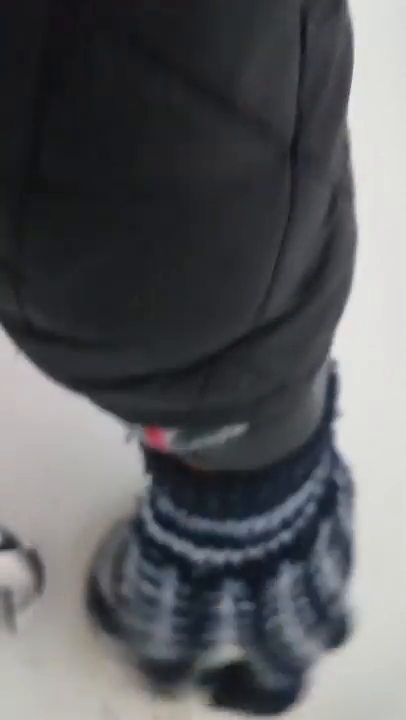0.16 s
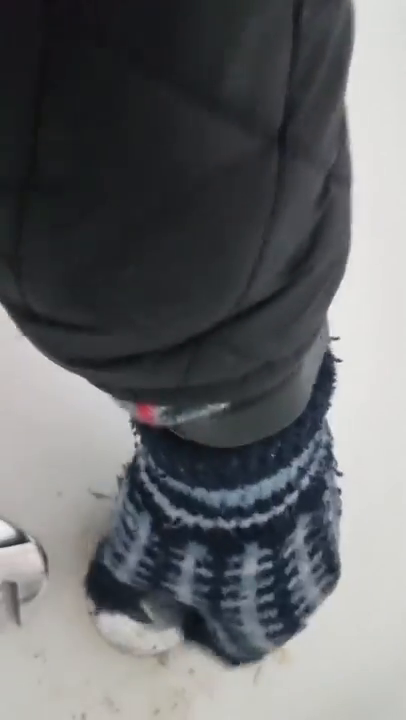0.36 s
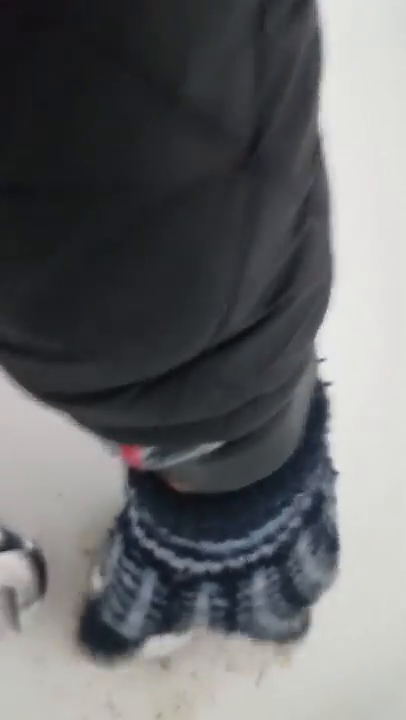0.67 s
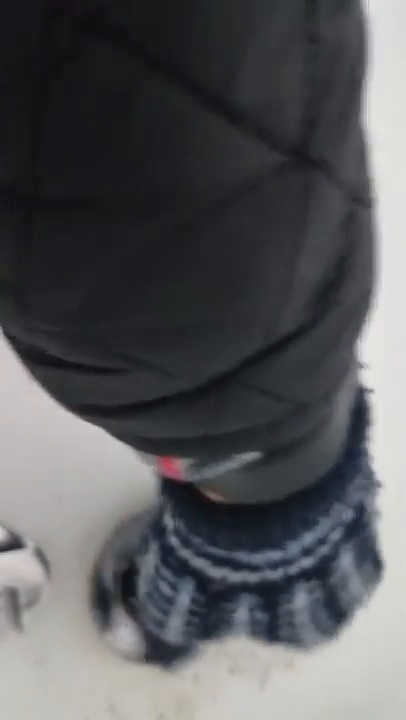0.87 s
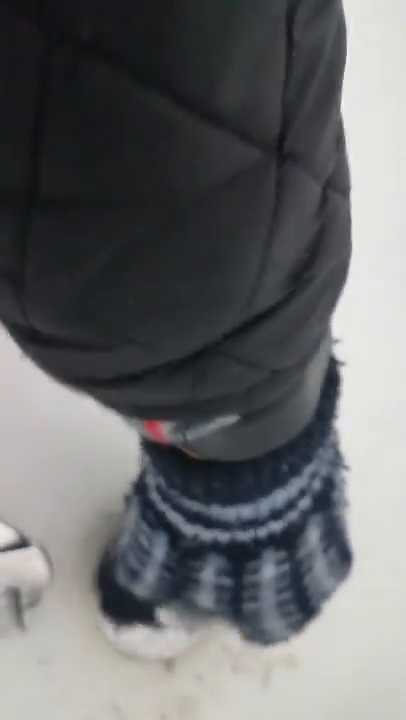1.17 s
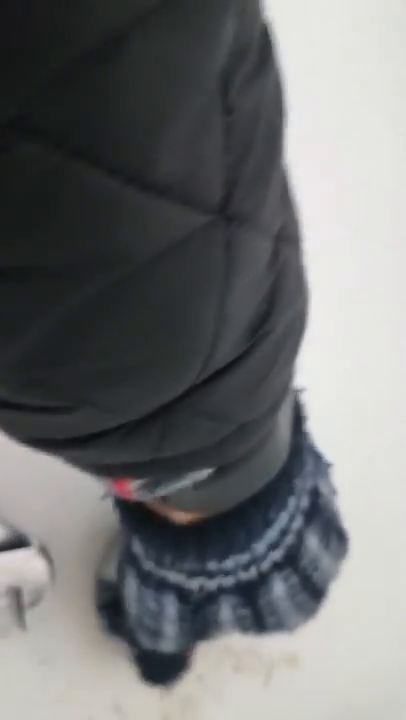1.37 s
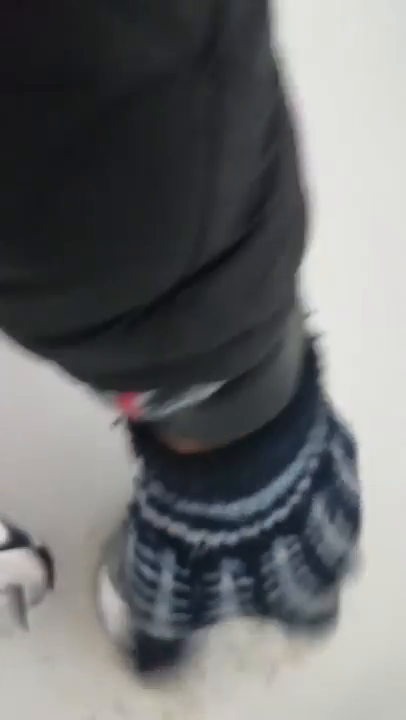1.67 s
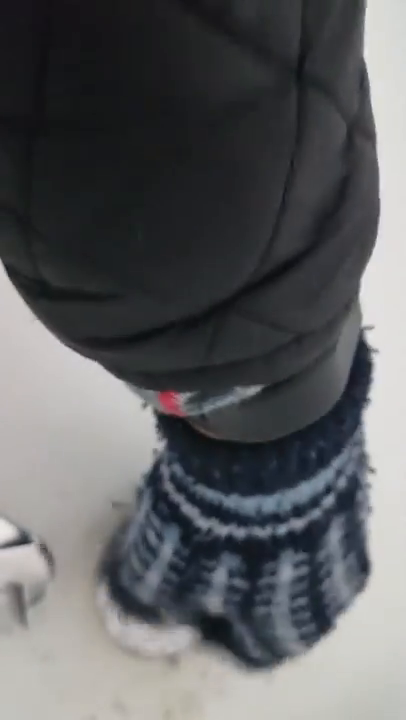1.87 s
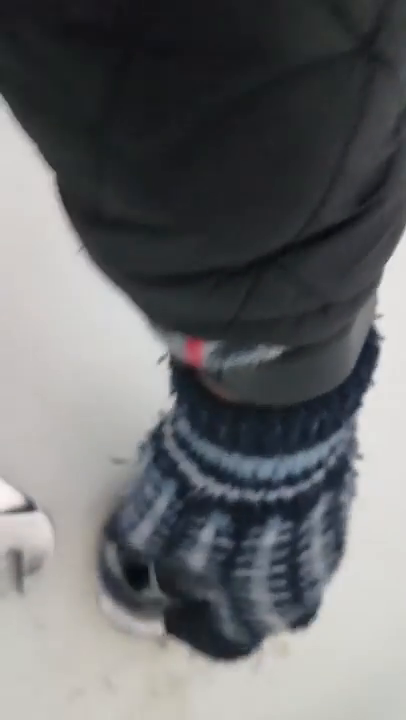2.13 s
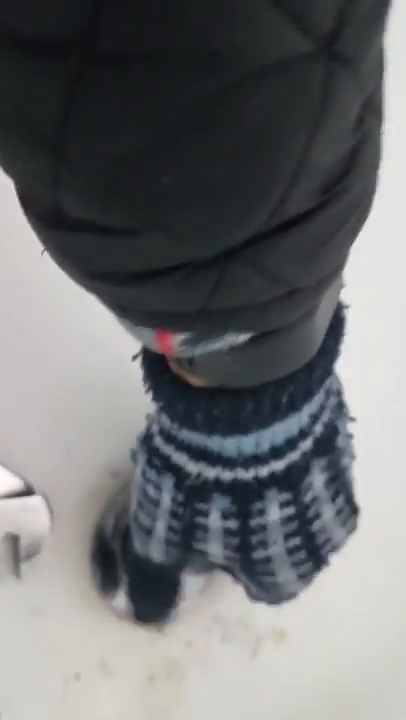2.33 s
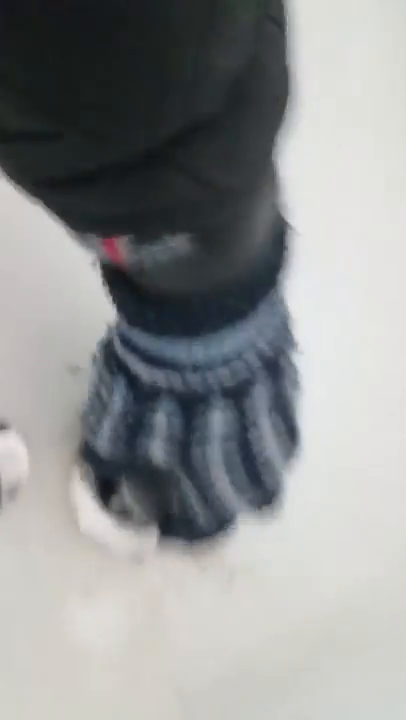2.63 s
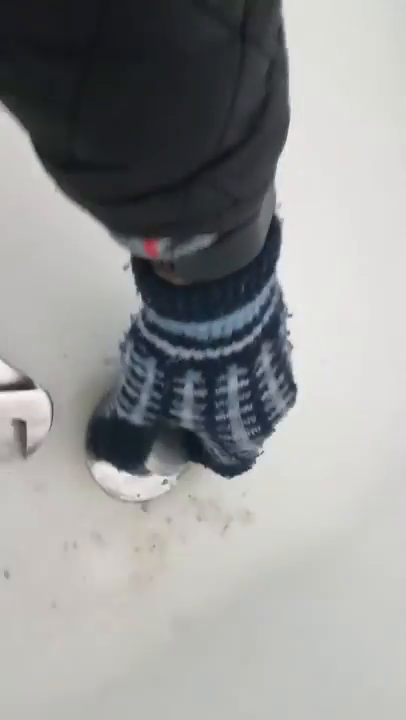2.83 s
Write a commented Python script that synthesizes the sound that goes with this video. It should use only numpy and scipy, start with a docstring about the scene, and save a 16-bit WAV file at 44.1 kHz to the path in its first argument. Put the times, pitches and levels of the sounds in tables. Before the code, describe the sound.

A loose metal drain stopper is turned in short strokes in an empty bathtub, knocking unevenly on its seat; each clunk rings the tub briefly, over low thread grinding, faint sleeve rustle and quiet room tone, close stereo.

```python
"""A gloved hand turns a loose metal drain stopper in an empty enamelled bathtub, in short strokes, heard in stereo.
Room tone, a sleeve's rustle and thread grinding in the tub's low modes are there from the start, rising and falling.
From 0.09 s the stopper knocks on its seat, each contact ringing the tub shell's dense modes; from 0.3 s it chimes.
From 0.59 s some contacts leave single modes singing; from 0.77 s rubs swell in among the knocks.
After the last knock at 2.78 s the tub rings out over the grinding, the sleeve and the room."""
import sys
import numpy as np
from scipy import signal
from scipy.io import wavfile
from scipy.ndimage import uniform_filter1d

SR = 44100
rng = np.random.default_rng(int(sys.argv[2]) if len(sys.argv) > 2 else 0)


def write(x):
    x = np.atleast_2d(x).T
    wavfile.write(sys.argv[1], SR, np.round(np.clip(x, -1, 1) * 32767).astype(np.int16))


N = 132300

# Knocks of the stopper on its seat: (time [s], peak [dB], then relative to the peak:
# boom [dB], thud [dB], low-mid [dB], treble [dB], tick [dB])
KNOCKS = [(0.0878, -38, -31, -15, -15, -45, -32), (0.1311, -39, -14, 2.5, -1.5, -39, -31),
          (0.247, -22.5, -10, -9, -5, -40, -35), (0.3354, -17, -11, -10, -7, -29, -36),
          (0.408, -8.5, -15.5, -18.5, -21, -32, -44), (0.5928, -24, -27, -11.5, -23.5, -22, -49),
          (0.6647, -28, -10, -4, 3.5, -15, -31), (0.7495, -32.5, 5.5, -26, -12, -1, -26),
          (0.8098, -12, -40, -17, -19.5, -27, -44), (0.8892, -12, -19.5, -18.5, -14.5, -24.5, -50),
          (1.1806, -33.5, 6, 1.5, 5, -33, -35), (1.2306, -23, -26, -10.5, -4, -57, -45),
          (1.2693, -24.5, -37, -19.5, -35, -21, -70), (1.4554, -33.5, 3.5, 0.5, 1, -58, -26),
          (1.5334, -27.5, -11, -15, -11, -29.5, -17), (1.7643, -25, -3.5, -8.5, -6.5, -69, -51),
          (1.808, -40.5, 7, 2.5, -2, -19, -45), (1.9214, -8.5, -50, -33, -22.5, -30.5, -36),
          (2.2087, -18.5, -8.5, -11.5, -13.5, -29, -49), (2.289, -11.5, -24, -14.5, -22, -21.5, -51),
          (2.3664, -12.5, -13.5, -19, -11, -27.5, -29), (2.4389, -12, -23, -26, -16.5, -15.5, -80),
          (2.7827, -43, -22, -1, 7, -15, -34)]
# Rubs, where the stopper drags before it catches: (start [s], swell [s], then the six levels of a knock [dB])
RUBS = [(0.768, 0.026, -14.5, -7.5, -14, -16.5, -25, -29), (1.1, 0.042, -32, -3.5, -7.5, -5, -19, -31),
        (1.382, 0.029, -29, -36, -22, -8, -29, -13), (1.84, .045, -29, -20, 5.5, 4, -15, -24),
        (2.004, .014, -13.5, -22.5, -22.5, -16, -34.5, -47), (2.174, 0.033, -31, 5.5, 3, -2.5, -19, -33),
        (2.555, 0.02, -25.5, -18, -10, -10.5, -13, -20), (2.618, 0.039, -25, -4, -6, -5.5, -20.5, -8)]
# Where the boom, thud, low-mid, peak, treble and tick levels apply: frequency [Hz]
COLOUR_HZ = [150, 360, 800, 2000, 5500, 12000]
# Strongest modes of the tub: (frequency [Hz], relative level [dB])
TUB_MODES = [(68, -12), (110, -9.5), (136, -6), (164, 0), (228, -8), (267, -7), (310, -11), (340, -2),
             (361, -1), (403, -3), (455, -10.5), (512, -10), (590, -13.5), (637, -8), (715, -13.5),
             (840, -28), (1165, -12), (1670, -12.5), (1770, -18.5), (2460, -13.5), (2736, -13),
             (3094, -10.5)]
# Colour of the tub shell: (frequency [Hz], relative level per mode [dB])
SHELL_COLOUR = [(450, 1.5), (1200, 6.5), (1700, -0.5), (2600, 3.5), (3200, 4.5), (3800, -3), (4700, 0),
                (8000, 2.5), (10000, -8.5), (15000, 5)]
# Ring time of the tub: (frequency [Hz], time to fall 60 dB [s])
RING_TIME = [(60, 0.9), (160, 0.59), (420, 0.53), (1100, 0.41), (2900, 0.35), (7700, 0.25), (15000, 0.11)]
# Single modes that one contact sets singing above the rest: (time [s], frequency [Hz], level [dB])
SINGING_MODES = [(0.594, 1630, -42), (0.59, 3122, -36.5), (0.592, 4370, -50), (0.664, 644, -36),
                 (0.748, 2450, -36), (0.746, 3830, -42.5), (1.27, 3120, -40), (1.385, 2020, -37.5),
                 (2.207, 2810, -44), (2.207, 1169, -31.5), (2.228, 2085, -40), (2.232, 267, -30.5),
                 (2.647, 267, -33), (2.656, 163.8, -25.5)]
# Thread grinding: (time [s], level [dB])
GRIND_LEVEL = [(0.0, -39), (0.08, -57.5), (0.23, -43.5), (0.37, -31), (0.43, -36), (0.8, -38),
               (0.94, -47.5), (1.09, -39), (1.59, -51.5), (1.81, -44), (1.94, -32), (2.23, -43.5),
               (2.36, -38), (2.46, -31.5), (2.59, -54.5), (3.0, -43)]
# Modes of the stopper: (frequency [Hz], relative level [dB], time to fall 60 dB [s])
CHIME_MODES = [(10730, 0, .12), (12790, -5, .08), (12900, -7, .08), (14260, -11, .08)]
# Chime of the stopper while the glove lets it ring: (time [s], level [dB])
CHIME_LEVEL = [(0.0, -68), (0.29, -87), (0.36, -50.5), (0.45, -70), (0.52, -49), (0.58, -93), (0.71, -103),
               (0.74, -49.5), (0.93, -75), (1.21, -64), (1.7, -83), (1.94, -54.5), (1.97, -68), (2.13, -81),
               (2.2, -51), (2.23, -83), (2.34, -109), (2.36, -44), (2.51, -71), (2.65, -54), (2.75, -78)]
# Sleeve rustle: (time [s], level [dB])
RUSTLE_LEVEL = [(0.0, -55), (0.37, -66.5), (0.52, -56.5), (0.78, -55.5), (1.12, -51.5), (1.36, -44),
                (1.59, -58), (2.04, -55.5), (2.41, -48.5), (2.79, -44), (3.0, -43)]
# Spectrum of the cloth: (frequency [Hz], relative level per Hz [dB])
CLOTH_SPECTRUM = [(300, 0.5), (1200, 2.5), (4000, -7), (7000, -12), (10000, -16), (13000, -10),
                  (15800, -22)]
# Spectrum of the room tone: (frequency [Hz], relative level per Hz [dB])
ROOM_SPECTRUM = [(30, -12), (60, 14), (120, 16.5), (350, -7), (2000, -23), (4500, -53), (9000, -55),
                 (13000, -19), (15800, -34)]
# Likeness of the left and right microphone signals: (frequency [Hz], correlation [-1 to 1])
LIKENESS = [(60, 0.97), (290, 1), (640, 0.71), (1410, -0.049), (3100, 0.56), (6820, -0.52), (15000, 0.49)]
# Stereo balance: (frequency [Hz], left minus right [dB])
BALANCE = [(60, -4), (110, 4), (200, -5), (380, -6.5), (700, -1), (1290, -8.5), (2380, -13), (4400, -12),
           (8120, -5.5), (15000, 3)]

BOOM_DB, SHELL_DB = -3.5, -28  # offsets of the tub modes and the shell modes
SPREAD_DB, LUMPY_DB = 2, 2.5  # uneven strengths: mode by mode, and in clusters of neighbours
RISE_S, RISE_CYCLES = 0.0052, 0.82  # modes build up, the low ones more slowly
LEAD_S = 0.004  # a contact begins this far ahead of its listed time
# louder, uneven first moments while the stopper chatters
BITE, BITE_S, CHATTER_DB, CHATTER_HZ = 0.2, 0.014, 3.5, 1000
SING_SHARE = 0.95  # ring time of a singing mode, as a share of the shell's
SLIPS_PER_S, GRIND_WANDER_DB, GRIND_WIDTH_HZ = 450, 3.5, 22.6
ROOM_DB = -49
RIGHT_LAG = 10  # samples
RUMBLE_CUT_HZ, TOP_CUT_HZ = 30, 15900
DRIFT_STEP = 40  # samples between the points of a slow drift


def knocks(shell_count=1200):
    """Every knock or rub drives all modes of the tub with new strengths, while the stopper chatters on its seat."""
    sudden = np.insert(np.array(KNOCKS), 1, 1 / SR, axis=1)  # a knock swells within one sample
    contacts = np.vstack([sudden, RUBS])
    tub_hz, tub_db = np.transpose(TUB_MODES)
    place = (np.arange(shell_count) + rng.random(shell_count)) / shell_count
    shell_hz = 440 + 15300 * place ** 1.8  # denser towards the low end
    hz = np.concatenate([tub_hz, shell_hz])
    own_db = np.concatenate([BOOM_DB + tub_db, SHELL_DB + at_hz(SHELL_COLOUR, shell_hz)])

    t = np.arange(int(0.55 * SR), dtype=np.float32) / SR
    modes = ringing_modes(hz, t)
    gains = [contact_gains(row[2:], hz, own_db, shell_hz[0]) for row in contacts]
    rings = np.array(gains, np.float32) @ modes

    out = np.zeros((2, N + SR))
    chatter = np.resize(drift(CHATTER_HZ), N + SR)
    fade_end = np.clip((t[-1] - t) * 10, 0, 1)
    for (time, swell), ring in zip(contacts[:, :2], rings):
        start = int((time - LEAD_S) * SR)
        at = slice(start, start + len(t))
        fresh = np.exp(-np.maximum(t - swell, 0) / BITE_S)  # full until the swell ends
        uneven = amp(CHATTER_DB * fresh * chatter[at])
        swelling = np.minimum(t / swell, 1)
        out[:, at] += ring * swelling * (1 + BITE * fresh) * uneven * fade_end
    return out[:, :N]


def ringing_modes(hz, t):
    """Each mode is a sine that builds up in a few milliseconds and decays at the tub's ring time."""
    turns = (np.outer(hz.astype(np.float32), t) + rng.random((len(hz), 1), np.float32)) % 1
    decay_rate = -np.log(1000) / at_hz(RING_TIME, hz)
    decay = np.exp(np.outer(decay_rate.astype(np.float32), t))
    rise_rate = 1 / (RISE_S + RISE_CYCLES / hz)
    rise = np.minimum(np.outer(rise_rate.astype(np.float32), t), 1)
    return np.sin(np.float32(2 * np.pi) * turns) * decay * rise


def contact_gains(levels, hz, own_db, lowest_shell_hz):
    """One contact's stereo push on every mode: its colour, plus its own favoured clusters of modes."""
    peak_db, boom, thud, low_mid, treble, tick = levels
    mid, side, spread, lumps = rng.standard_normal((4, len(hz)))
    colour_db = at_hz(np.transpose([COLOUR_HZ, [boom, thud, low_mid, 0, treble, tick]]), hz)
    clusters = rms_one(uniform_filter1d(lumps, size=10))
    colour_db = colour_db + LUMPY_DB * clusters * (hz > lowest_shell_hz)
    push = amp(peak_db + own_db + colour_db + SPREAD_DB * spread)
    return push * stereo(np.sign(mid), np.sign(side), hz)


def singing():
    """Each listed mode of the tub builds up and rings out alone as a decaying tone."""
    out = np.zeros((2, N + SR))
    t = np.arange(SR // 2) / SR
    for time, hz, db in SINGING_MODES:
        rise = np.minimum(t / (RISE_S + RISE_CYCLES / hz), 1)
        decay = amp(db - 60 * t / (SING_SHARE * at_hz(RING_TIME, hz)))
        tone = rise * decay * np.exp(2j * np.pi * (hz * t + rng.random()))
        start = int(time * SR)
        out[:, start:start + len(t)] += stereo(tone.real, tone.imag, hz)
    return out[:, :N]


def grind():
    """The thread's slips drive the low tub modes, each waxing and waning as the hand moves."""
    thread = slips()
    radius = np.exp(-np.pi * GRIND_WIDTH_HZ / SR)
    out = 0
    for k, (hz, db) in enumerate(TUB_MODES):
        if hz < 1000:
            level = amp(db + GRIND_WANDER_DB * drift(5.0))
            out = out + (-1) ** k * level * resonate(thread, hz, radius)  # alternate polarity
    return amp(in_time(GRIND_LEVEL)) * rms_one(out)


def chime():
    """Slips of the thread also keep the high modes of the stopper ringing."""
    thread = slips()
    out = 0
    for hz, db, t60 in CHIME_MODES:
        radius = amp(-60 / (t60 * SR))
        out = out + amp(db) * rms_one(resonate(thread, hz, radius))
    return amp(in_time(CHIME_LEVEL)) * out


def slips():
    """Two unrelated trains of dense uneven slips of the thread, as single-sample impulses."""
    strength = amp(4.04 * np.minimum(rng.exponential(1, (2, N)), 4))
    sign = rng.choice([-1, 1], (2, N))
    happens = rng.random((2, N)) < SLIPS_PER_S / SR
    return happens * strength * sign + 1e-18  # the tiny offset keeps the filters off zero


def resonate(x, hz, radius):
    """One mode as a two-pole resonator with this pole radius, spread over the two channels."""
    poles = [1, -2 * radius * np.cos(2 * np.pi * hz / SR), radius * radius]
    mid, side = signal.lfilter([1 - radius, 0, radius - 1], poles, x)
    return stereo(mid, side, hz)


def rustle():
    """The sleeve is flickering noise with the spectrum of cloth, following the level of the rustle."""
    return amp(in_time(RUSTLE_LEVEL)) * banded_noise(CLOTH_SPECTRUM, patchy_db=1.65)


def room_tone():
    """The room behind it all is a steady bed of noise, its bands flickering only slightly."""
    return amp(ROOM_DB) * banded_noise(ROOM_SPECTRUM, patchy_db=0.5)


def banded_noise(spectrum, patchy_db):
    """Half-octave bands of stereo noise, flickering almost independently; rms 1 in all."""
    out, together = 0, drift(6.0)
    edges = 22 * 2 ** np.arange(0, 10, 0.5)
    white = rng.standard_normal((2, 2, N))  # neighbouring bands take different noise
    for k, (low, high) in enumerate(zip(edges, edges[1:])):
        band = signal.butter(2, [low, high], "band", fs=SR, output="sos")
        mid, side = signal.sosfilt(band, white[k % 2])
        hz = np.sqrt(low * high)
        flicker_db = patchy_db * (0.043 * together + drift(27))
        out = out + amp(at_hz(spectrum, hz) + flicker_db) * stereo(mid, side, hz)
    return rms_one(out)


def drift(rate_hz):
    """Random wander of rms 1: noise through two equal poles at rate_hz, joined by straight lines."""
    r = np.exp(-2 * np.pi * DRIFT_STEP * rate_hz / SR)
    noise = rng.standard_normal(N // DRIFT_STEP + 2002)
    slow = signal.lfilter([1], [1, -2 * r, r * r], noise)[2000:]  # drop the filter's start
    return np.interp(np.arange(N) / DRIFT_STEP, np.arange(len(slow)), rms_one(slow))


def stereo(mid, side, hz):
    """Left and right from two unrelated signals, with the likeness and balance at hz."""
    alike = np.clip(at_hz(LIKENESS, hz), -1, 1)
    lean_db = at_hz(BALANCE, hz) / 2
    mid, side = np.sqrt(1 + alike) * mid, np.sqrt(1 - alike) * side
    return np.array([amp(lean_db) * (mid + side), amp(-lean_db) * (mid - side)]) / np.sqrt(2)


def at_hz(points, hz):
    """A spectrum table read on a log frequency axis."""
    points = np.array(points)
    return np.interp(np.log(hz), np.log(points[:, 0]), points[:, 1])


def in_time(rows):
    """A (time, level) curve read at every sample."""
    return np.interp(np.arange(N) / SR, *np.transpose(rows))


def amp(db):
    """dB to gain."""
    return 10 ** (np.asarray(db) / 20)


def rms_one(x):
    """Scale to rms 1."""
    return x / np.sqrt(np.mean(x ** 2) + 1e-20)


def scene():
    """The stopper in the tub in front, then the sleeve, then the room."""
    return knocks() + singing() + grind() + chime() + rustle() + room_tone()


def record(dry):
    """The right microphone port is a little further off, so its sound lags; rumble and top are cut."""
    right = np.append(np.zeros(RIGHT_LAG), dry[1, :-RIGHT_LAG])
    rumble_cut = signal.butter(4, RUMBLE_CUT_HZ, "high", fs=SR, output="sos")
    top_cut = signal.ellip(12, 0.5, 70, TOP_CUT_HZ, fs=SR, output="sos")
    return signal.sosfilt(top_cut, signal.sosfilt(rumble_cut, [dry[0], right]))


dry = scene()
out = record(dry)
write(out)
```